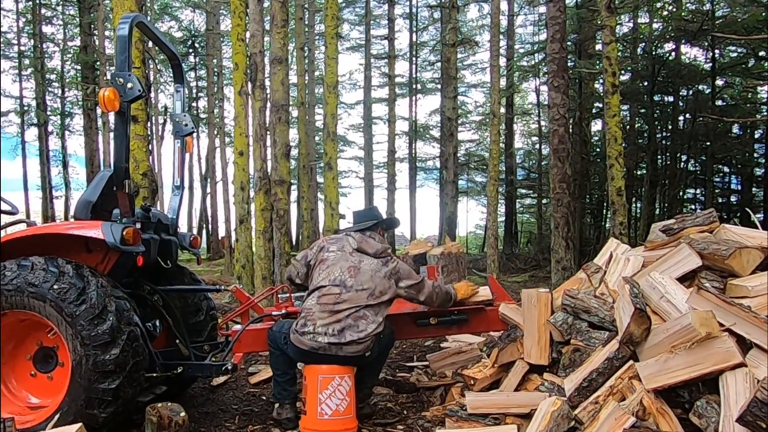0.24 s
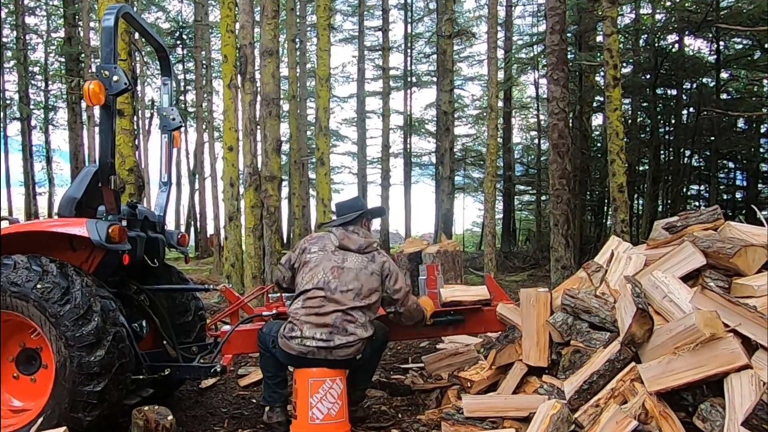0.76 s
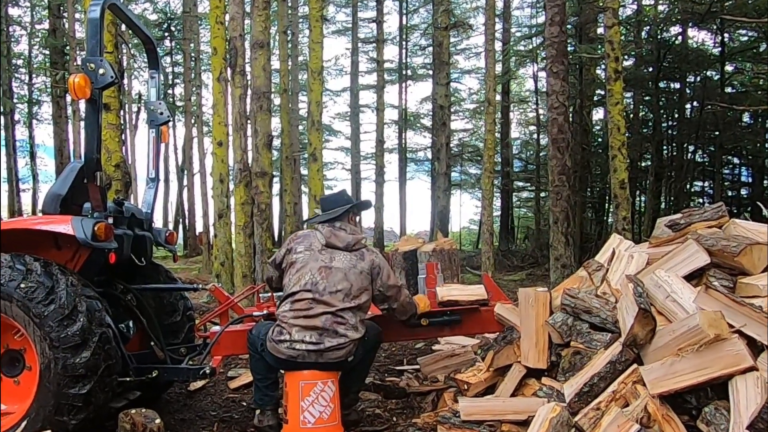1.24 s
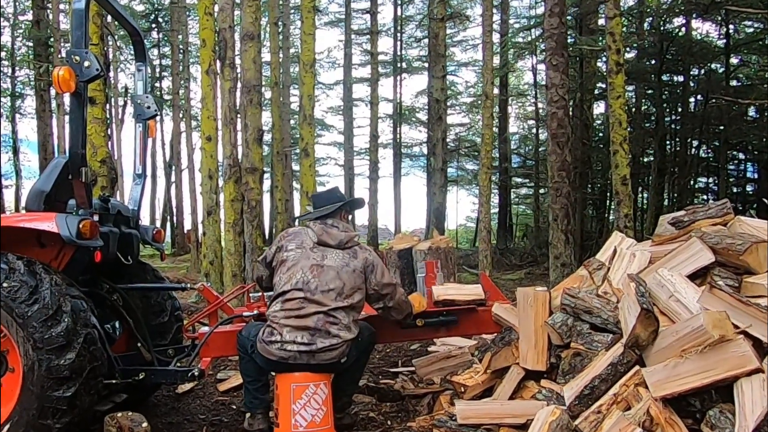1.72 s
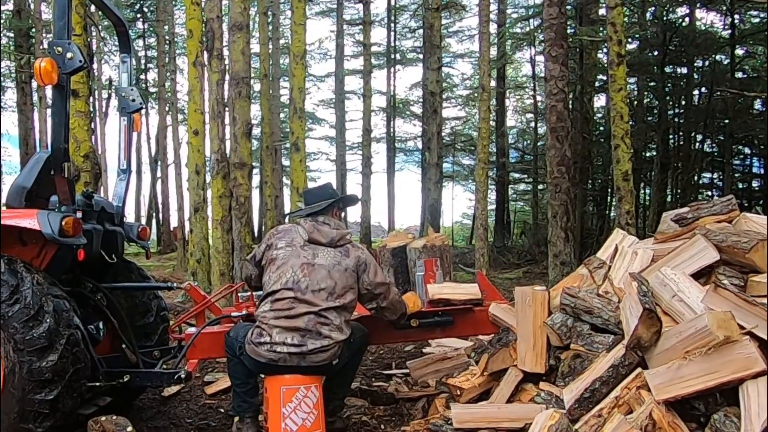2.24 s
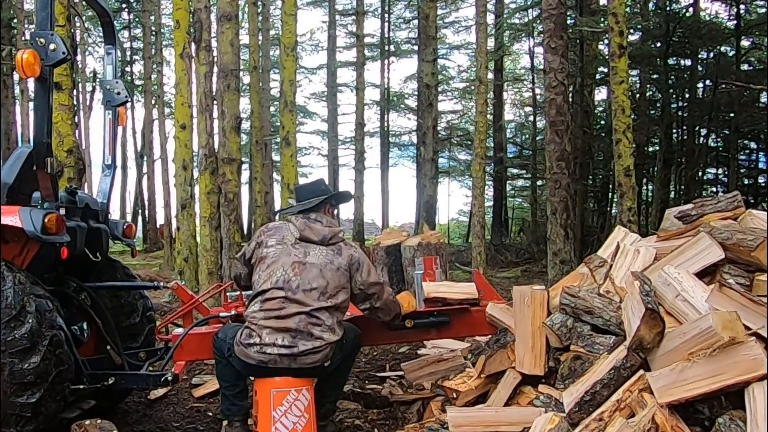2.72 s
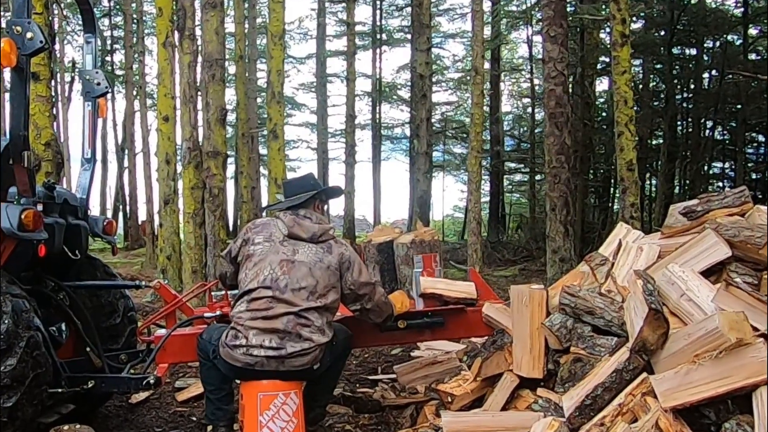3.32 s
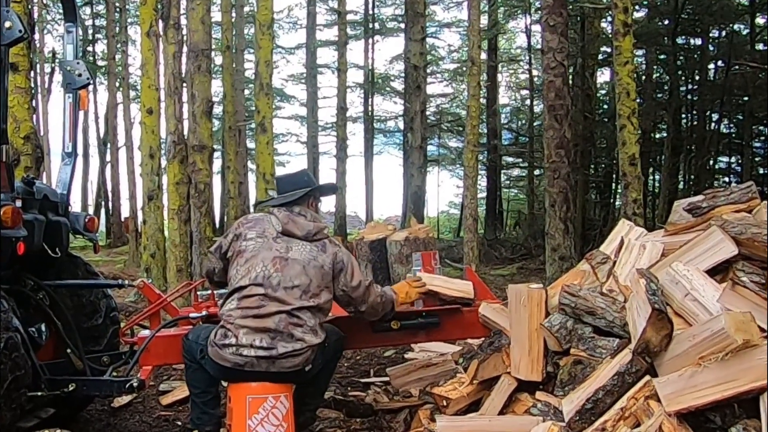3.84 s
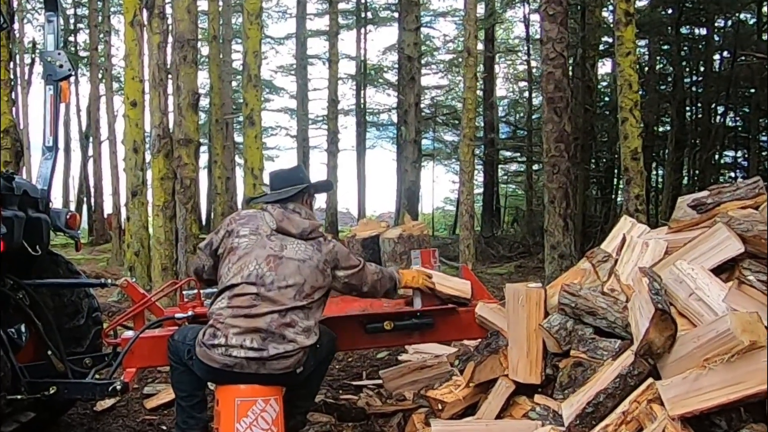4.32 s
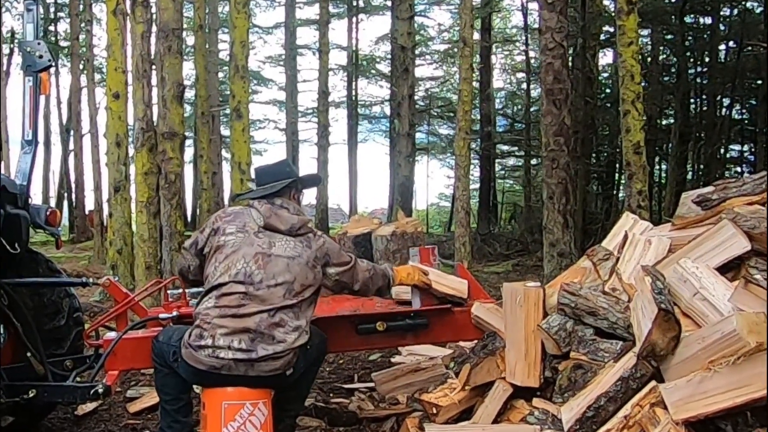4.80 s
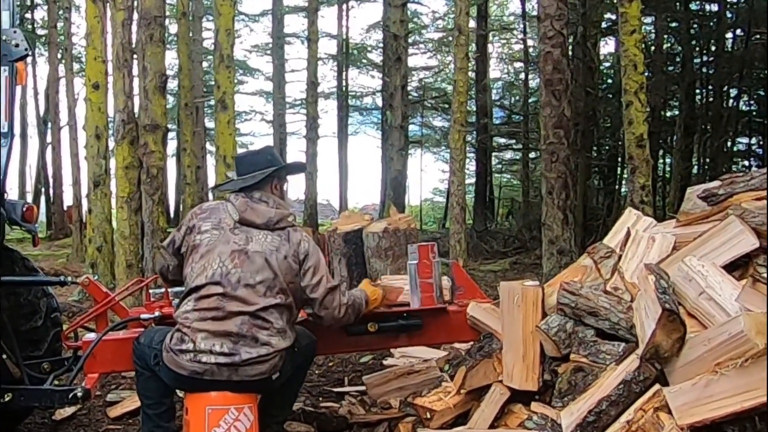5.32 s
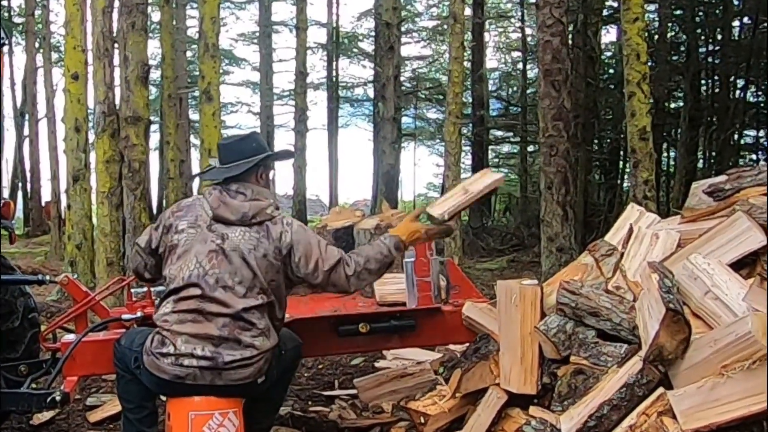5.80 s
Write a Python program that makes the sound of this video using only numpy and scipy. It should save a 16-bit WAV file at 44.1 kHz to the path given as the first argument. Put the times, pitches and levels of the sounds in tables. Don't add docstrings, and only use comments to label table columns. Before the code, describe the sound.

Steady clattering tractor diesel and pump whine outdoors, slowly swelling, with log fibres snapping and hard wooden cracks from a hydraulic splitter.

```python
import sys
import numpy as np
from scipy import signal
from scipy.fft import rfft, irfft, next_fast_len
from scipy.io import wavfile

SR = 44100
rng = np.random.default_rng(int(sys.argv[2]) if len(sys.argv) > 2 else 0)


def gain_from_db(level_db):
    decades = np.asarray(level_db, float) / 20
    return 10 ** decades


def wav_out(sig):
    wavfile.write(sys.argv[1], SR, np.round(np.clip(np.atleast_2d(sig).T, -1, 1) * 32767).astype(np.int16))


N = 267025
TIME = np.arange(N) / SR
CYCLE_HZ = 15.1231

# frequency in Hz, level in dB per order width.
RUSH_SPECTRUM = [(30, -61.5), (90, -33), (165, -27), (300, -39.5), (550, -40.5), (1000, -42), (1600, -41),
                 (2700, -44.5), (3600, -41), (3900, -48), (6200, -51), (10500, -69.5), (11500, -76),
                 (14800, -86)]
# frequency in Hz, level in dB per order.
CLATTER_SPECTRUM = [(250, -35), (450, -39.5), (620, -44.5), (1000, -50.5), (1500, -45.5), (2000, -47.5),
                    (3000, -42), (3600, -58.5), (4200, -76.5), (7000, -60.5), (10000, -89.5), (14000, -105)]
# centre in Hz, width in Hz, boost in dB.
PANELS = [(657, 130, 4.5), (740, 81, 11.5), (1135, 43, 12), (1446, 160, 11), (1720, 30, 11),
          (2000, 30, 5.5), (2320, 93, 6), (3245, 70, 11.5)]
# frequency in Hz, left minus right in dB.
LEAN = [(150, 0), (400, .3), (630, 3.5), (1000, 6), (1610, 8.5), (2570, 6.5), (4110, 3), (6570, -1.5),
        (10500, -.5)]
# frequency in Hz, left-right likeness from 0 to 1.
LIKENESS = [(200, 1), (400, .98), (700, .92), (1400, .75), (2800, .85), (4500, .78), (8000, .5),
            (13000, .55)]
# frequency in Hz, lead of the left in radians.
LEAD = [(250, 0), (450, .3), (800, .3), (1600, 0), (2200, -.4), (3100, -.3), (5600, 1.2), (8000, 2.1),
        (11000, 2.9)]
# time in seconds, level in dB.
HOSE_LEVEL = [
    (0, -21),
    (1, -34.5),
    (2.4, -34.5),
    (2.8, -58.5),
    (6.06, -37),
]
TEETH = [24, 33, 42, 43, 48, 53, 55, 75, 95, 96, 108, 137, 184, 187, 201]
# level in dB, left minus right in dB.
WHINE = [(-37, -1), (-38.5, 0.5), (-23, 4), (-28.5, -5.5), (-27, 12), (-42, -6.5), (-33.5, 10), (-34, 22.5),
         (-41, 5), (-33, 12), (-27, 12.5), (-37, 21), (-21.5, 8), (-35.5, 8.5), (-39.5, 5)]
# place in the cycle from 0 to 1, strength in dB.
CONTACTS = [(.02, 7.5), (.075, 4.5), (.165, 3.5), (.28, -15.5), (.335, 9), (.405, 3.5), (.505, 7),
            (.58, -10), (.67, 11), (.73, 1), (.83, 3), (.94, -6)]
# place in the cycle from 0 to 1, level in dB.
KNOCKS = [(.67, -18), (.73, -21), (.075, -25), (.165, -26), (.335, -27), (.83, -26)]
# frequency in Hz, level in dB, 60 dB decay time in seconds.
BLOCK_MODES = [(1420, 0, .03), (1660, 1, .028), (1150, -16, .02), (2200, -12, .015), (3400, -1, .015)]
EXHAUST_DB = [-39, -2, -26, -25.5, -5.5, -26.5, -21, -6, -15, -25.5, -18.5, -28, -43.5, -23.5, -63, -41.5,
              -31.5]
# start in seconds, peak in dB, ring in Hz, low ring in Hz, low part in dB.
SPLITS = [
    (.2924, -19, 3340, 1300, -13),
    (0.3054, -25, 3230, 1180, -18),
    (0.3085, -17.5, 2870, 1210, -8),
    (0.3301, -17, 3070, 1270, -9),
    (.6722, -19, 3420, 1140, -1.5),
    (1.7103, -11.5, 3460, 1850, -14),
    (2.062, -10, 3620, 1810, -26),
    (2.5801, -8, 3040, 2360, -19.5),
    (2.6456, -10, 3480, 1005, -8.5),
    (5.985, -15.5, 3150, 2080, -2),
]
# start in seconds, peak in dB, centre in Hz.
TICKS = [(0.2098, -25.5, 3770), (0.2463, -34, 5500), (.258, -28.5, 4570), (.2926, -39, 8000),
         (0.3055, -27.5, 6500), (0.313, -30, 3200), (1.7102, -27, 5800), (2.063, -30, 8000),
         (.481, -35, 6500), (0.5038, -30, 5500), (.6722, -25, 6360), (1.0805, -33, 3500),
         (1.368, -48, 7500), (1.399, -29, 6000), (1.6367, -24, 3600), (2.121, -42, 7040),
         (2.419, -42, 7000), (2.479, -44, 8000), (2.519, -33, 6000), (2.533, -31, 5000),
         (2.6192, -23.5, 4280), (2.627, -32, 5500), (2.6446, -26, 6950), (4.523, -33.5, 7000),
         (4.63, -38, 7000), (4.6753, -26, 4500), (5.986, -27, 7000), (5.993, -27, 4300),
         (5.997, -19.5, 5500), (6.001, -29.5, 7400)]
# start in seconds, depth in dB.
DUCKS = [
    (.335, -3.5),
    (2.65, -2),
]


def at_hz(points, hz):
    table = np.array(points)
    return np.interp(np.log(hz + 1), np.log(table[:, 0]), table[:, 1])


def drift(rate_hz):
    pole = np.exp(-80 * np.pi * rate_hz / SR)
    slow = signal.lfilter([1], [1, -2 * pole, pole * pole], rng.standard_normal(N // 40 + 4002))[4000:]
    return np.interp(np.arange(N) / 40, np.arange(len(slow)), slow / slow.std())


def band(x, low_hz, high_hz):
    return signal.sosfilt(signal.butter(2, [low_hz, high_hz], "band", fs=SR, output="sos"), x)


def peak_one(x):
    return x / np.abs(x).max()


def pan(left_minus_right_db):
    return gain_from_db(np.array([[left_minus_right_db / 2], [-left_minus_right_db / 2]]))


def gain(s):
    start, ceiling = gain_from_db(-24.5), gain_from_db(-14)
    climb = start + (ceiling - start) * np.minimum(s / 5, 1)
    for at, depth_db in DUCKS:
        age = np.maximum(s - at, 0)
        dip = np.exp(-age / 0.46) * (1 - np.exp(-age / 0.0023))
        climb = climb * gain_from_db(depth_db * dip)
    return climb


def coloured(pair, spectrum, ring):
    size = next_fast_len(N)
    hz = np.fft.rfftfreq(size, 1 / SR)
    level_db = at_hz(spectrum, hz)
    for centre_hz, width_hz, boost_db in PANELS:
        level_db = level_db + ring * boost_db / (1 + (2 * (hz - centre_hz) / width_hz) ** 2)
    mid, side = rfft(pair / pair.std(), size)
    alike = np.clip(at_hz(LIKENESS, hz), 0, 1)
    mid = np.sqrt((1 + alike) / 2) * mid
    side = np.sqrt((1 - alike) / 2) * side
    lean = gain_from_db(at_hz(LEAN, hz) / 2) * np.exp(.5j * at_hz(LEAD, hz))
    level = gain_from_db(level_db) * np.sqrt(SR / 2 / CYCLE_HZ)
    return irfft(level * np.array([(mid + side) * lean, (mid - side) / lean]), size)[:, :N]


def crank():
    return CYCLE_HZ * TIME + .0016 * drift(.6) + .00008 * drift(21)


def contact_envelope(turns, decay_s, between_db):
    envelope = gain_from_db(between_db)
    luck_db = rng.normal(0, 1.3, (100, len(CONTACTS)))
    for k, (place, level_db) in enumerate(CONTACTS):
        since = turns + 1 - place
        strength = gain_from_db(level_db + luck_db[since.astype(int), k])
        envelope = envelope + strength * np.exp(-(since % 1) / CYCLE_HZ / decay_s)
    return envelope


def rush(turns):
    chopped = rng.standard_normal((2, N)) * contact_envelope(turns, decay_s=0.0063, between_db=13.5)
    return coloured(chopped, RUSH_SPECTRUM, ring=0.083)


def hose():
    hum = band(rng.standard_normal(N), 348, 369.8)
    return gain_from_db(np.interp(TIME, *np.transpose(HOSE_LEVEL))) * hum / hum.std()


def whine(turns):
    out = 0
    for teeth, (level_db, pan_db) in zip(TEETH, WHINE):
        level = gain_from_db(level_db + 0.5 + 1.73 * drift(15.4))
        phase = 2 * np.pi * (teeth * turns + rng.random()) + 0.16 * drift(12)
        out = out + level * np.sin(phase) * pan(pan_db)
    return out


def clatter(turns):
    size = round(SR / CYCLE_HZ)
    once = rng.standard_normal((2, size))
    looped = once[:, np.round(turns * size).astype(int) % size]
    struck = looped * contact_envelope(turns, decay_s=.003, between_db=2)
    return coloured(struck, CLATTER_SPECTRUM, ring=1.0)


def knock(turns):
    clicks, out = np.zeros(N), 0
    for place, level_db in KNOCKS:
        at = np.flatnonzero(np.diff(np.floor(turns - place)))
        clicks[at] = gain_from_db(level_db + rng.normal(0, 1.5, 100)[:len(at)])
    clicks = band(clicks + 1e-18, 700, 4200) * 2
    for hz, level_db, t60 in BLOCK_MODES:
        r, w = gain_from_db(-60 / (t60 * SR)), 2 * np.pi * hz / SR
        strike = [0, gain_from_db(level_db) * np.sin(w)]
        mode = signal.lfilter(strike, [1, -2 * r * np.cos(w), r * r], clicks)
        out = out + mode * pan(at_hz(LEAN, hz))
    return out


def exhaust(turns):
    out = 0
    for order, level_db in enumerate(EXHAUST_DB, start=2):
        lag = (order > 9.5) * (order - 7)
        if order in (7, 8):
            lag = 2 * np.pi * order * 2 / 3
        flutter = gain_from_db(.5 * drift(1.55))
        out = out + gain_from_db(level_db + 3) * flutter * np.sin(order * (2 * np.pi * turns + .17) - lag)
    return out * pan(-.3)


def snap(burst, other, age):
    decay_s, echo_s, tail_s = .0018, .0055, .014
    direct = np.exp(-age / decay_s)
    echo = gain_from_db(-13) * (age > echo_s) * np.exp(-abs(age - echo_s) / 0.0046)
    tail = gain_from_db(-19) * np.exp(-age / tail_s)
    return (direct + echo + tail) * np.array([burst + 0.4 * other, burst - 0.21 * other])


def split(hz, low_hz, low_db, pair, age):
    high = 0
    for k in range(3):
        since = np.maximum(age - k * 4 / hz, 0)
        slip_hz = hz * (1 + 0.084 * (1 - k))
        high = high + gain_from_db(-4.5 * k) * np.exp(-since / .0008) * np.sin(2 * np.pi * slip_hz * since)
    low = np.sin(2 * np.pi * low_hz * age) + 0.72 * np.sin(2 * np.pi * 1.96 * low_hz * age)
    low = low * np.exp(-age / 0.0029) * (1 - np.exp(-age / 0.00044))
    ringing = band(peak_one(high) + gain_from_db(low_db) * low, 360, 7000)
    noise = snap(*pair, age)
    rattle = gain_from_db(-6.5) * peak_one(band(band(noise, 0.81 * hz, 1.87 * hz), 1500, 5300))
    bright = gain_from_db(-13) * peak_one(band(band(noise, 4200, 6200), 3000, 10000))
    return ringing + rattle + bright


def tick(hz, pair, age):
    spread = 2 ** 0.38
    return peak_one(band(band(snap(*pair, age), hz / spread, hz * spread), 1500, 14000))


def cracks():
    length = 4000
    out, age = np.zeros((2, N + length)), np.arange(length) / SR
    bursts, sounds = rng.standard_normal((50, 2, length)), []
    for (s, peak_db, hz, low_hz, low_db), pair in zip(SPLITS, bursts):
        sounds.append((s, peak_db, split(hz, low_hz, low_db, pair, age)))
    for (s, peak_db, hz), pair in zip(TICKS, bursts[20:]):
        sounds.append((s, peak_db, tick(hz, pair, age)))
    for s, peak_db, sound in sounds:
        at = round(s * SR)
        out[:, at:at + length] += gain_from_db(peak_db) * pan(-3) / gain(s) * sound
    return out[:, :N]


def scene():
    turns = crank()
    engine = exhaust(turns) + whine(turns) + clatter(turns) + knock(turns)
    background = rush(turns) + hose()
    return engine + background + cracks()


def band_limit(x):
    return signal.sosfilt(signal.butter(12, 15800, fs=SR, output="sos"), x)


def record(dry):
    mix = dry * gain(TIME)
    return band_limit(mix)


dry = scene()
out = record(dry)
wav_out(out)
```